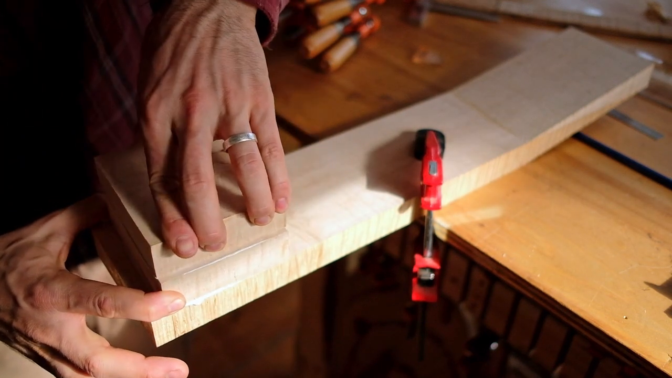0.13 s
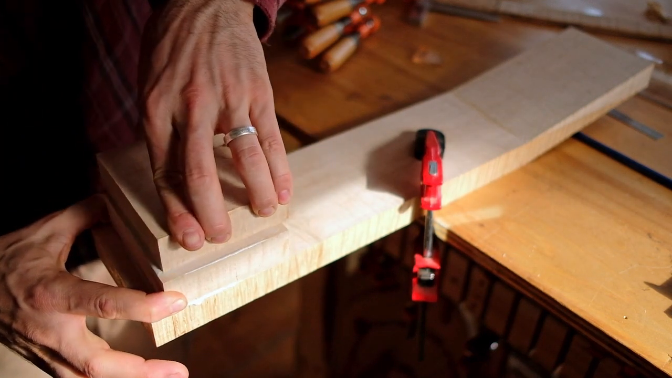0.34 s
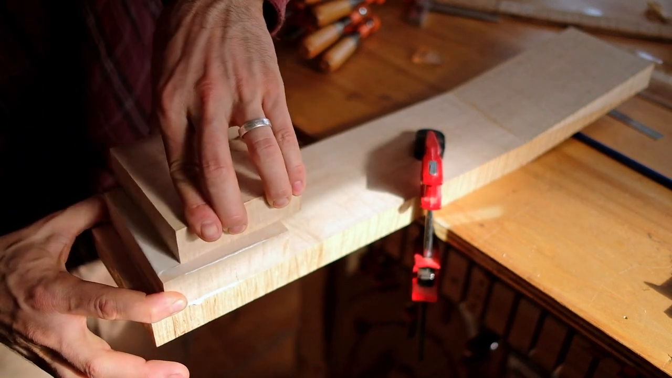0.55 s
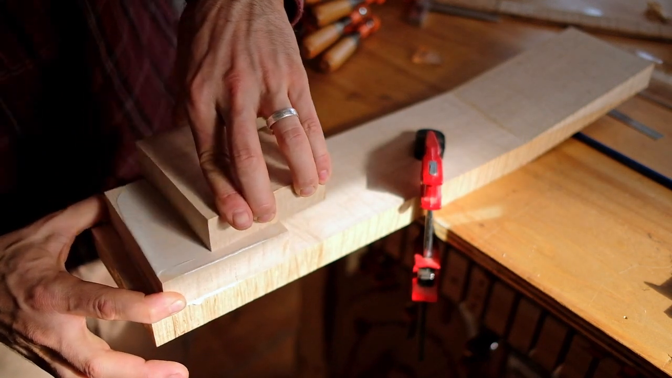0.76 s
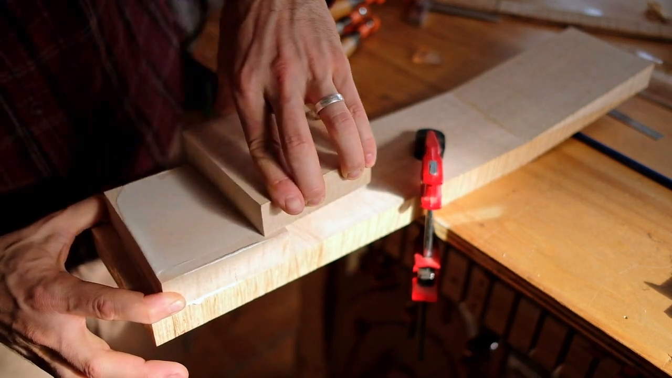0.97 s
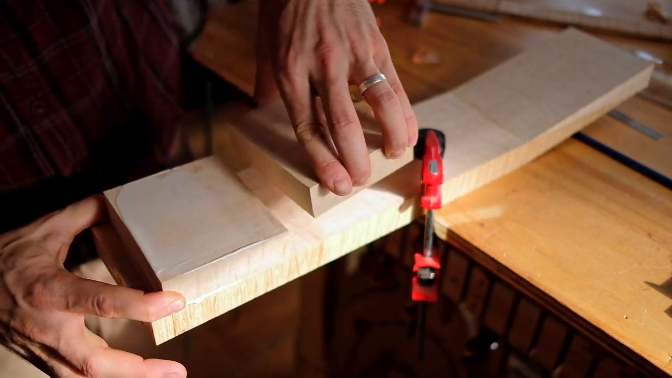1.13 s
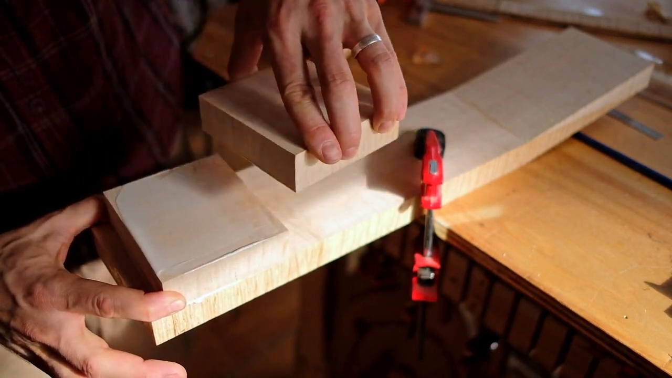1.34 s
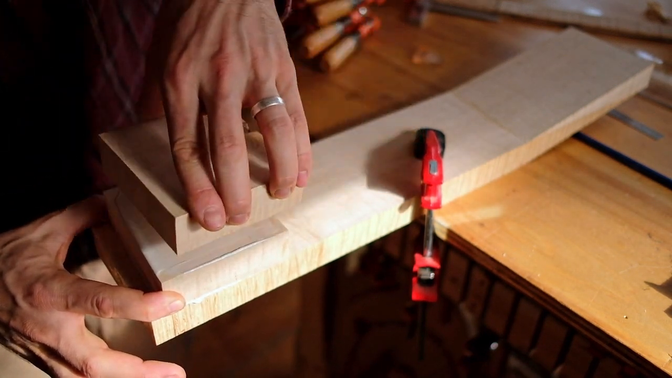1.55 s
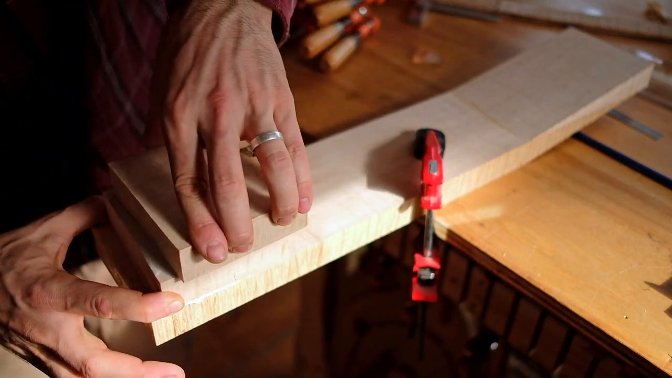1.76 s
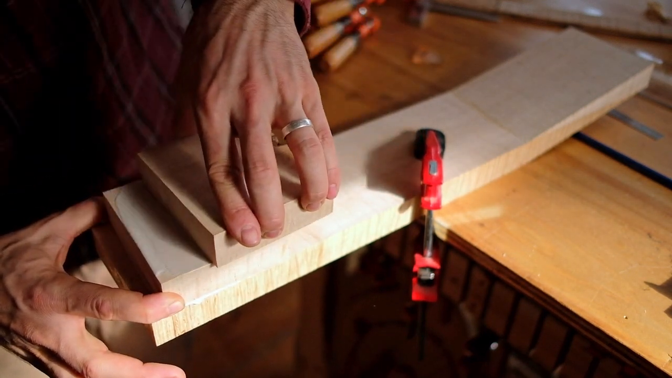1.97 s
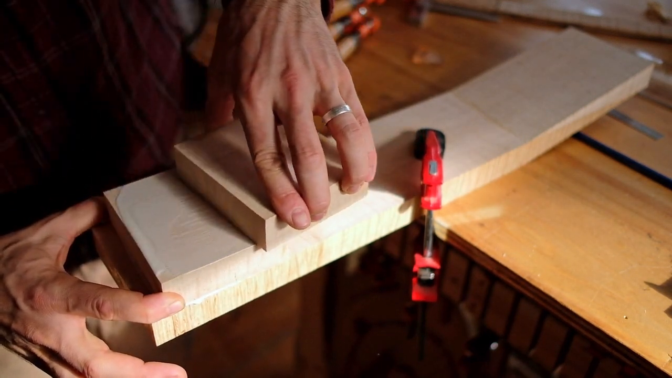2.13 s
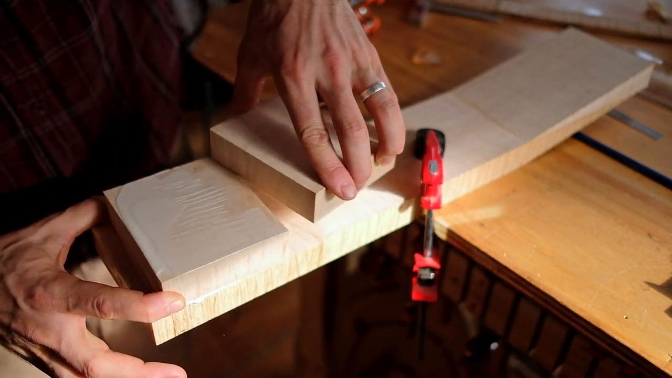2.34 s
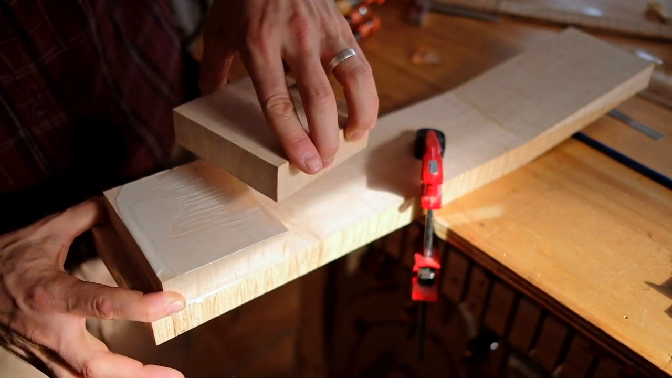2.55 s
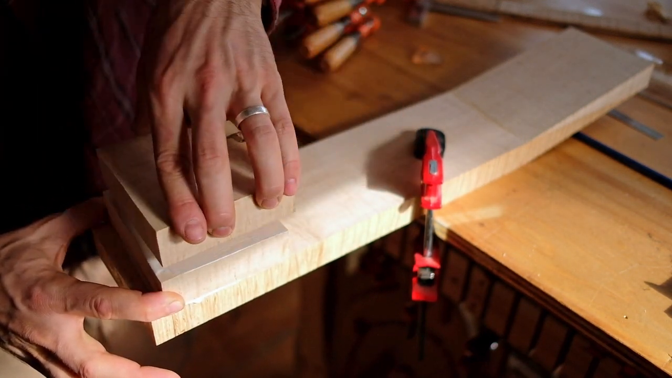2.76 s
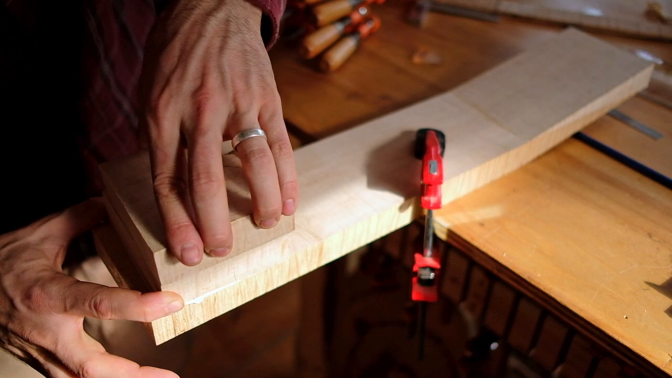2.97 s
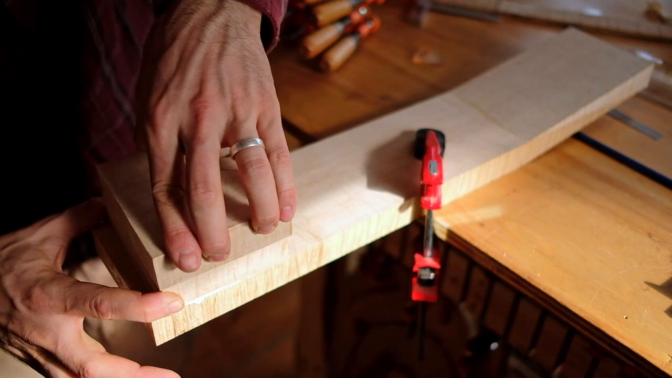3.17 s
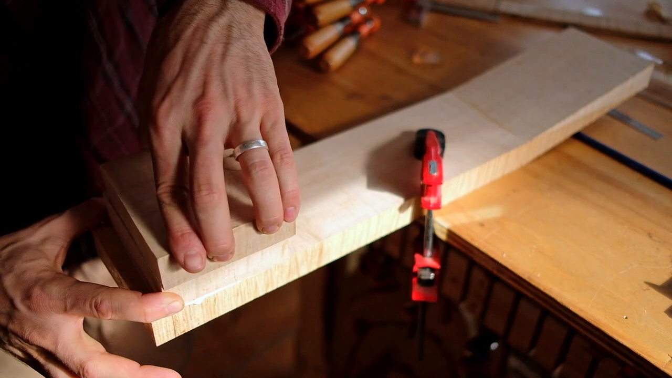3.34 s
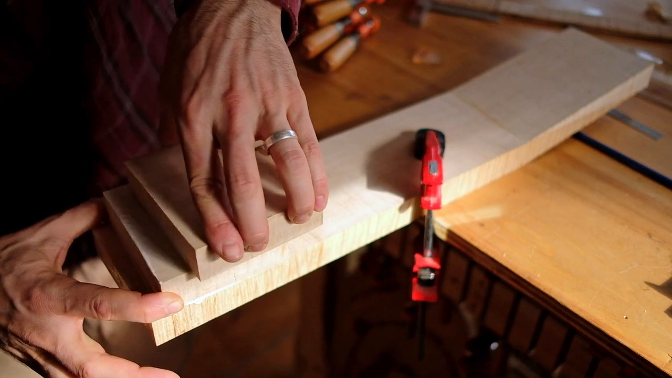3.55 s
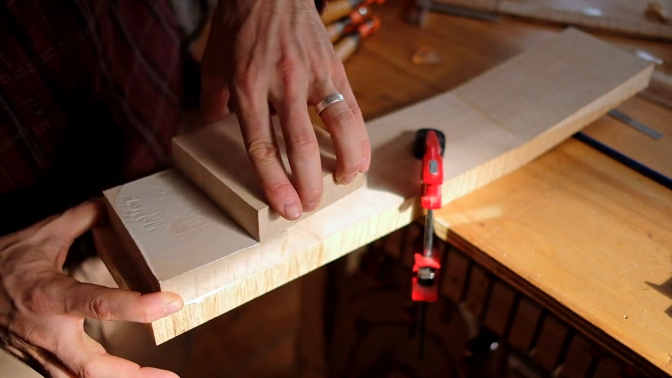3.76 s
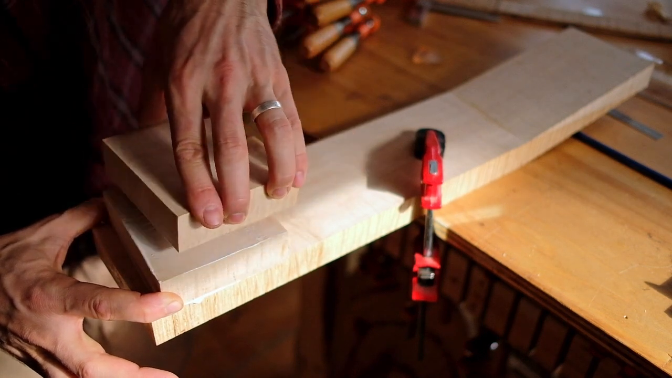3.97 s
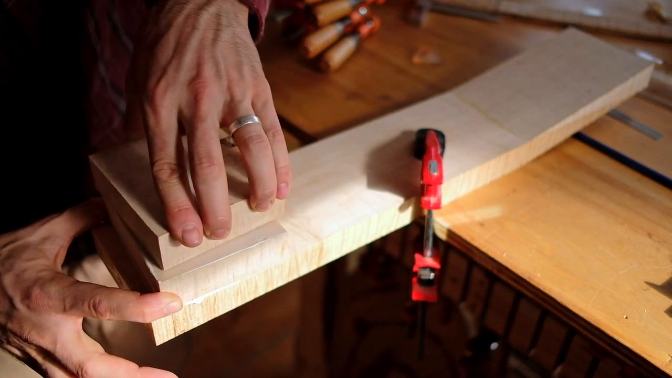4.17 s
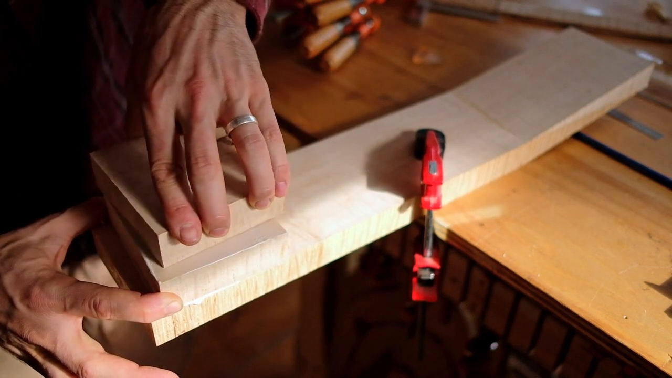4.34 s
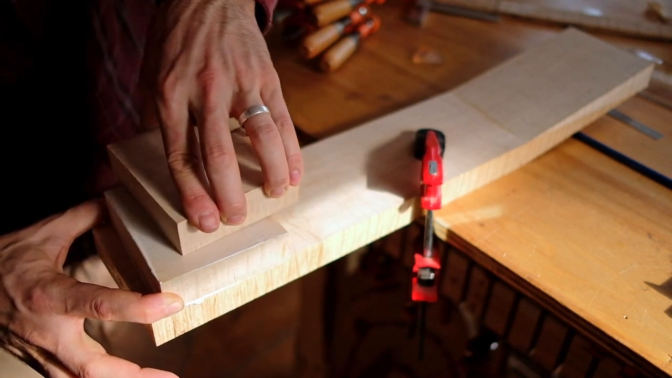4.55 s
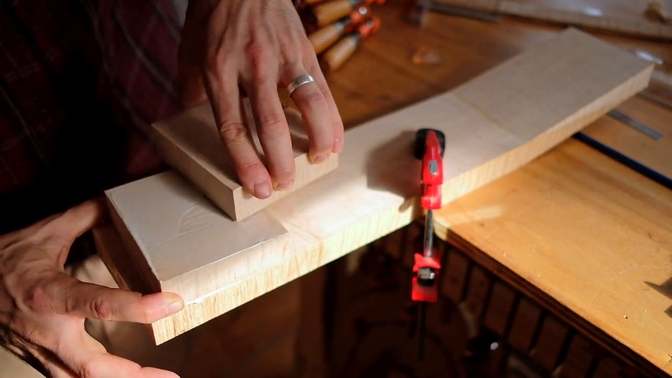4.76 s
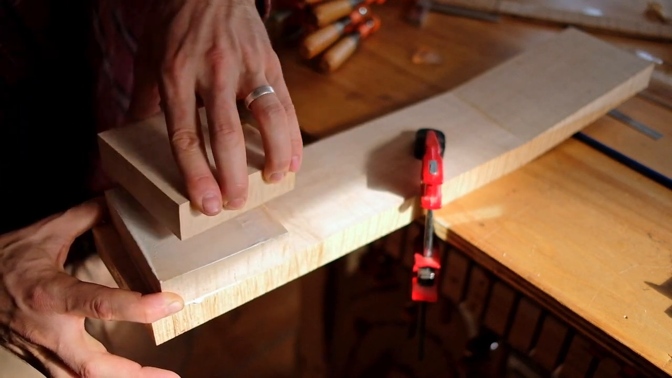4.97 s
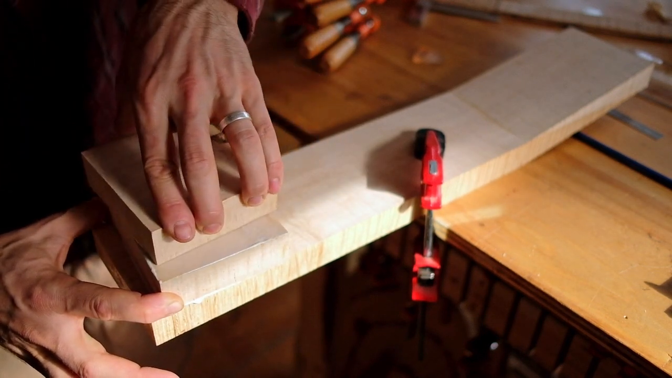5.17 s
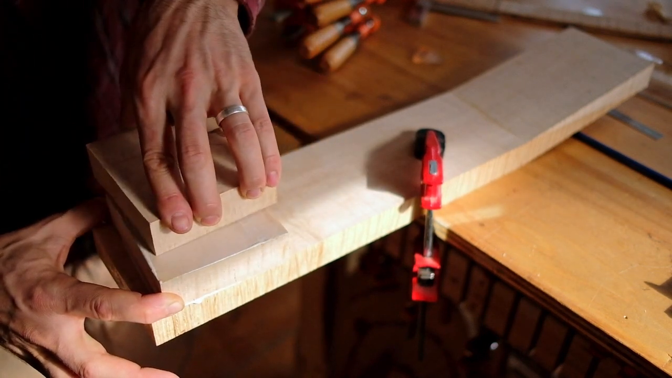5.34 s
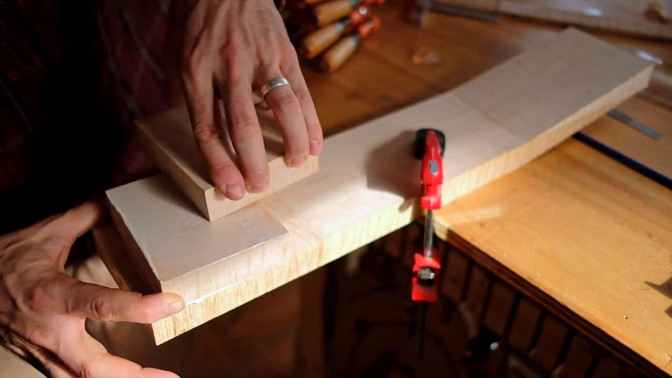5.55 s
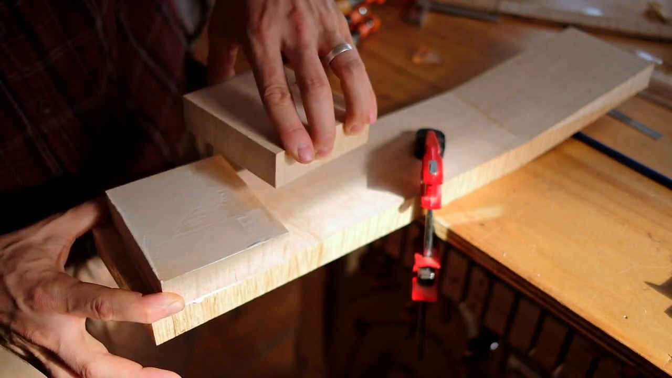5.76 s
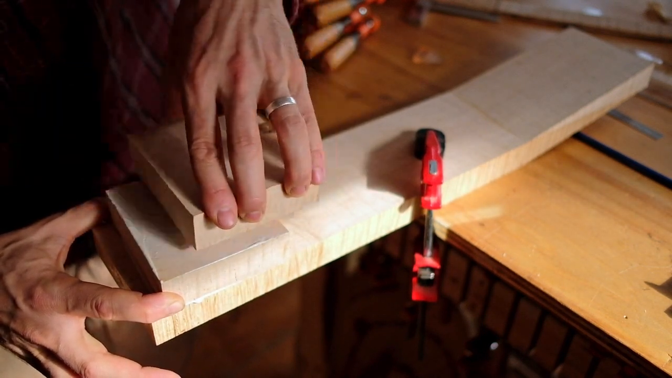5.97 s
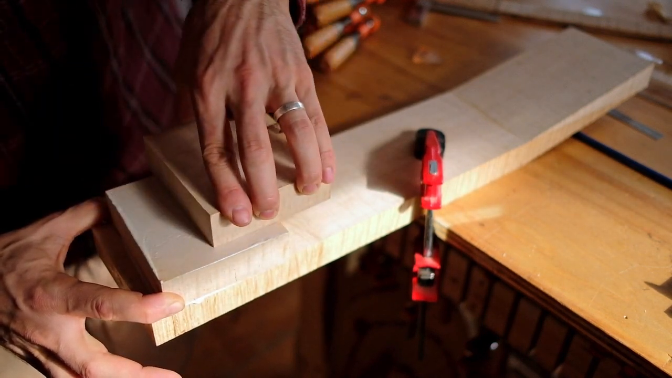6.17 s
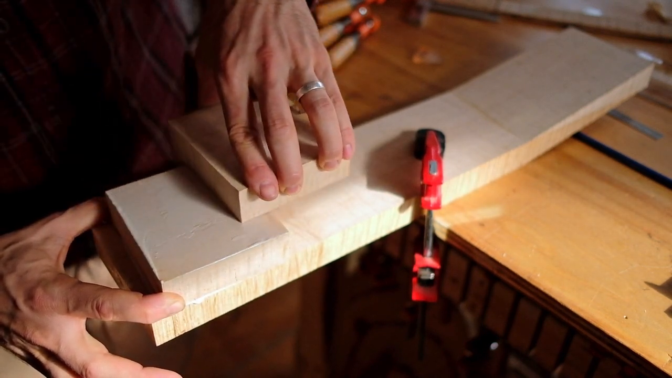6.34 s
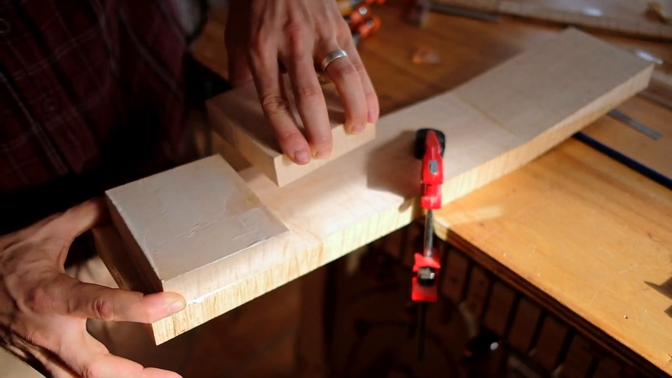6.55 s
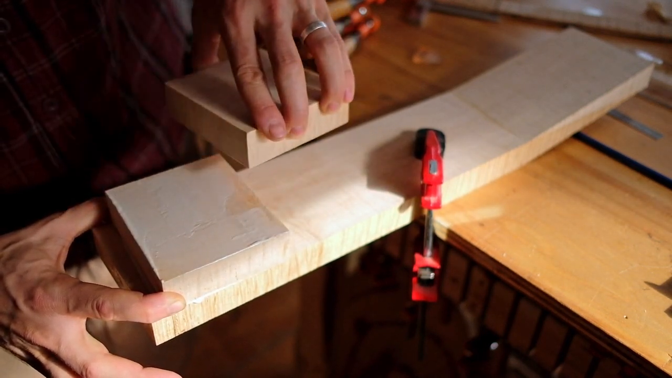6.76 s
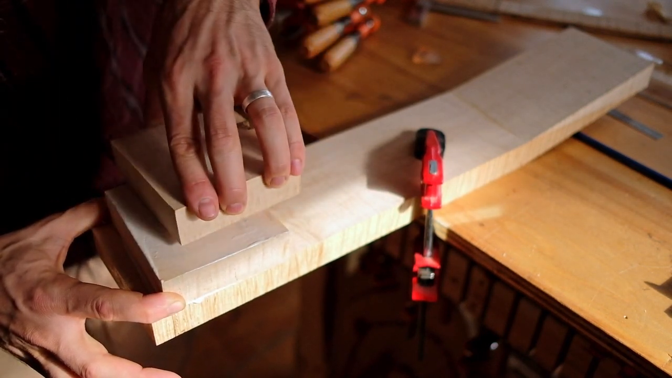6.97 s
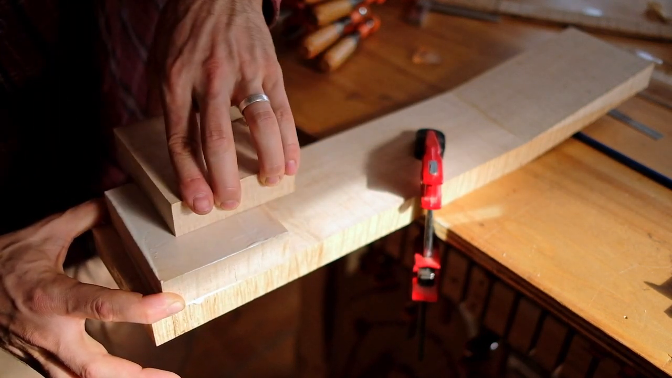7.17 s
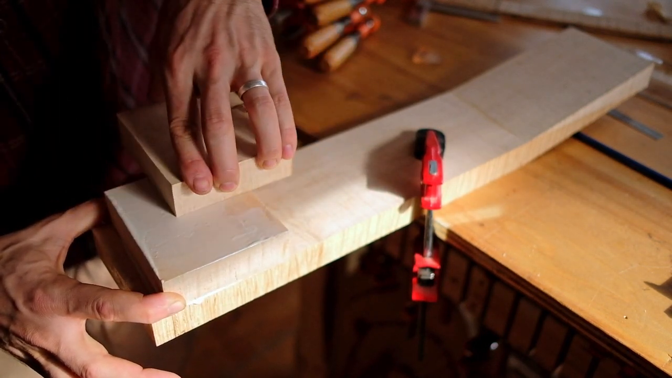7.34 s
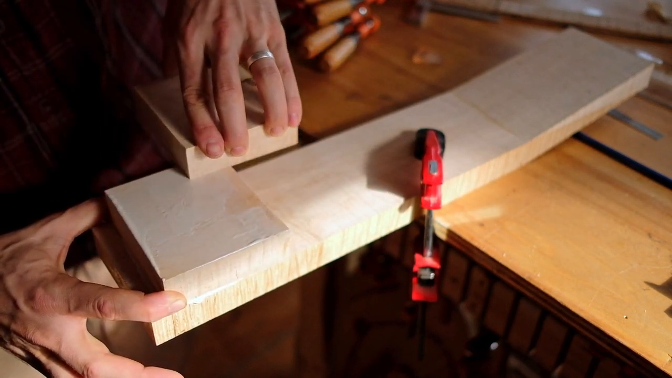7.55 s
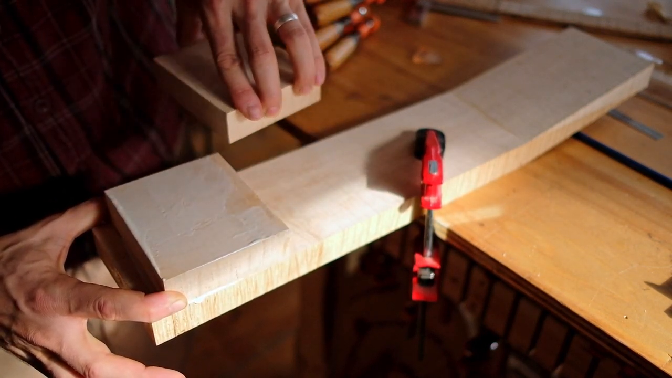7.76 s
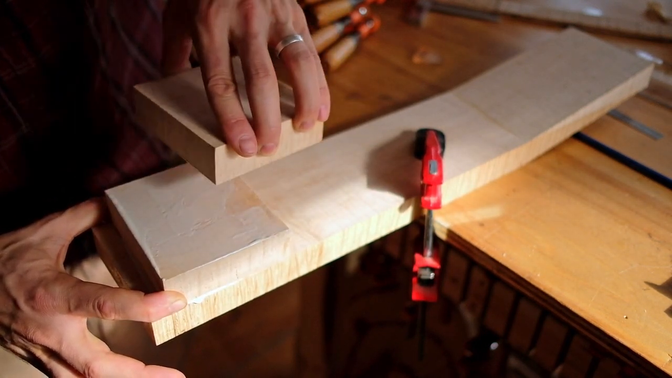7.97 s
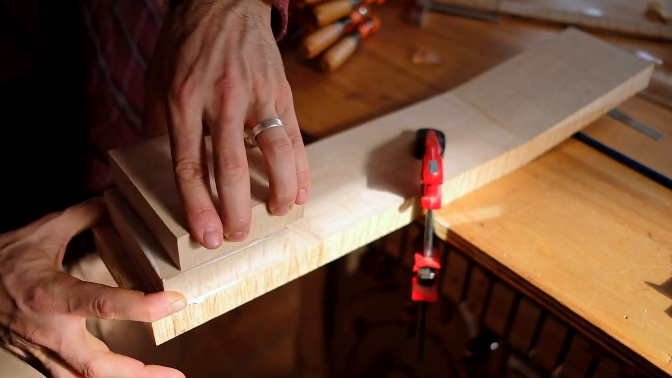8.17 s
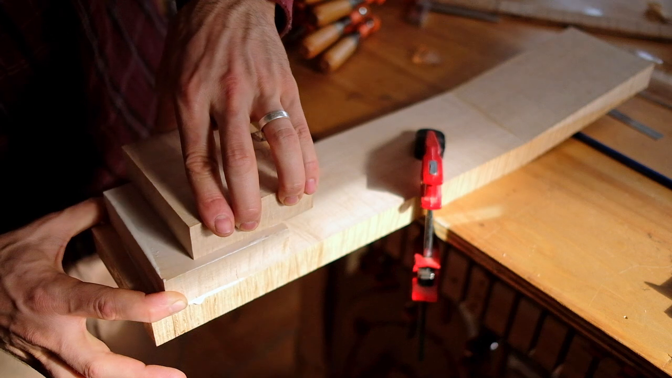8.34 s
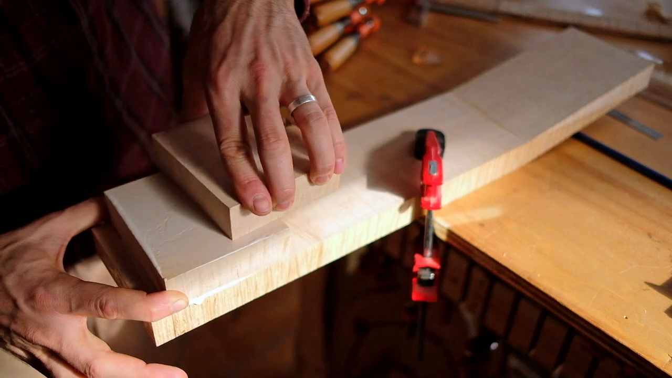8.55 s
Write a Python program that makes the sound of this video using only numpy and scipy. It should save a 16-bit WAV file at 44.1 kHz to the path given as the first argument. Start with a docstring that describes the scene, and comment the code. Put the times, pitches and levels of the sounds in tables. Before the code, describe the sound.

In a small quiet workshop, a wood block is lifted and set back on a thick plank. Solid, hollow knocks with low-mid body and a slight hard edge die within about a tenth of a second, leaving short room reflections. Strong and muted landings alternate, with very faint grain scrapes and dry clicks before some. Soft, steady, low-weighted air hiss lies underneath; the close microphones place the wood slightly left.

```python
"""Steady hiss, then a small tick, a scrape and a knock: a hand sets a wooden block down on a clamped wooden blank,
slides it off the edge and lifts it, again and again. Contact force spectra drive decaying modes of blank and bench;
dense random catches drive the same modes for slides; ticks are short rough tones. Single echoes and a small workshop
answer the wood; one low rumble swells around the first hard blow."""
import sys
import numpy as np
from scipy import signal
from scipy.fft import rfft, irfft
from scipy.io import wavfile
from scipy.ndimage import uniform_filter1d

SR = 44100
rng = np.random.default_rng(int(sys.argv[2]) if len(sys.argv) > 2 else 0)


def to_wav(s):
    """Save 16-bit WAV."""
    ch = np.atleast_2d(s).T  # columns
    pcm = np.round(np.clip(ch, -1, 1) * 32767)  # PCM
    wavfile.write(sys.argv[1], SR, pcm.astype(np.int16))


N = 379727  # samples

# Noise spectrum: freq_hz, relative_level_db
HISS_SPECTRUM = [(10, -29), (20, -11), (45, -5.5), (100, -4), (250, -4.5), (490, -9), (1000, -15),
                 (1600, -20), (2500, -24.5), (4000, -28), (6300, -31.5), (8000, -34), (12500, -38),
                 (15500, -43)]
# Noise balance: freq_hz, left_minus_right_db
HISS_BALANCE = [(60, 0.5), (220, 1.5), (820, 1.5), (3030, 0)]
# Noise left-right correlation: freq_hz, correlation_0_to_1
HISS_CORRELATION = [(40, 0.52), (300, 0.17), (2000, .05), (6000, .01)]
HISS_RMS_DB = -63.5  # mean of left and right

# Dry ticks of edges and fingers: start_s, level_db, pitch_hz, envelope_peak_ms
TICK_EVENTS = [(1.0447, -55, 1770, 1.3), (1.121, -47.5, 3180, 1.3), (2.3930, -54.5, 2960, 1.6),
               (3.7867, -49, 2520, 0.23), (4.8928, -53, 2510, 0.8), (6.5898, -46.5, 3000, 0.55),
               (6.5925, -50, 1960, 1.1), (7.602, -64, 10770, .12), (8.051, -60, 2560, 1.1)]

# Block sliding over the grain: start_s, length_s, rise_s, drag_db, rasp_db, drag_change_to_end_db, rasp_change_to_end_db
SLIDE_EVENTS = [(1.062, 0.06, 0.0083, -53, -68, -3, 11), (2.316, 0.085, 0.013, -44, -73, -6, 6),
                (3.75, 0.062, 0.016, -73, -70.5, -8, -1), (6.497, 0.037, .003, -51.5, -62, 5.5, -8),
                (6.569, 0.081, .01, -59, -71.5, -15, -5), (8.421, 0.08, 0.016, -65, -69, -11, -6)]
# Frequencies of the two catch force spectra: freq_hz
CATCH_HZ = [70, 190, 430, 770, 1200, 2100, 3300]
# Force of dull catches at CATCH_HZ: force_db
DULL_FORCE_DB = [-28.5, -12, -5, -0.5, -6.5, -21.5, -38]
# Force of sharp catches at CATCH_HZ: force_db
SHARP_FORCE_DB = [-60, -39, -32, -25, 4, 4.5, 2.5]
CATCHES_PER_S, SLIDE_STOP_S, SLIDE_PAN_DB = 2500, 0.02, -2.4
JUDDER_DB, JUDDER_S = 0.8, 0.013  # rms depth; inverse of the low-pass cutoff

# Modes of blank and bench: freq_hz, level_struck_at_end_db, level_struck_at_middle_db, t60_s
WOOD_MODES = [(68, 11, 13.5, 0.096), (152.1, -5.5, -1.5, 0.12), (222, -1.5, -5, .14),
              (239.3, 1.5, -1, 0.11), (315.4, 0, -1, 0.074), (361.3, -0.5, -3.5, 0.09),
              (417, -4.5, -0.5, 0.047), (453.5, -6.5, 0.5, .08), (503.5, 2.5, 1, 0.05),
              (531, -3, -2.5, 0.078), (587, -5.5, 0.5, .05), (657, -1, 0.5, 0.026), (697.5, -6, 5.5, 0.05),
              (770.6, 2, 2, 0.051), (882, 0.5, -1, 0.019), (988, -7, -6, 0.063), (1069, 3.5, -12, 0.03),
              (1172, -0.5, -6, 0.055), (1261, -2.5, -3.5, 0.057), (1300.4, -4.5, -3, 0.049),
              (1404, -5.5, -6.5, 0.031), (1568, -6, -12, 0.027), (1715, -2, -4.5, 0.015),
              (1896, -5.5, -1.5, 0.025), (1980, -1, -7, .025), (2169, -3, -4, .02),
              (2488, -0.5, 1.5, 0.012), (3080, 1, 1, .008), (3470, 1, 0, .008), (4300, -13, -12.5, 0.0054)]

# Block set down: start_s, level_db, contact_ms, bass_loss_db_per_octave, hard_corner_db, corner_contact_ms,
# place_0_end_1_middle, edge_click_rel_db
BLOW_EVENTS = [(1.125, -30, 0.89, 10.5, -8, 0.44, 0.53, -38), (1.7403, -7, 0.64, 8, -11.5, 0.48, 0.4, -39),
               (2.992, -14.5, 0.94, 7.5, -37, 0.42, 0.59, -45), (3.896, -46.5, 1.83, 12, -9, .42, 0.9, -35),
               (4.147, -29.5, 1.65, 0.8, -37, .42, 0.43, -44),
               (5.121, -19.5, 0.94, 2.5, -17.5, 0.5, 0.63, -30),
               (6.056, -8, 0.63, 7, -10.5, 0.36, 0.67, -30.5), (6.531, -30, 0.81, 2.5, -31, .42, 0.47, -33),
               (6.681, -48.5, 1.2, 7.5, -12.5, .42, 0.78, -34),
               (7.015, -10.5, 0.77, 5.5, -20.5, 0.72, 0.74, -45.5),
               (8.1805, -6.5, 0.81, 9, -29.5, 0.18, 0.71, -31.5)]
# Edge click spectrum: freq_hz, relative_level_db
CLICK_SPECTRUM = [(1000, -31), (2000, -1.5), (3200, 7.5), (4500, -9.5), (6300, -12), (10000, -23.5),
                  (15000, -36)]
CONTACT_FALL_DB_PER_OCT, CORNER_FALL_DB_PER_OCT = 39.5, 16
BENCH_CUT_HZ, BENCH_CUT_DB_PER_OCT = 170, 16
WOOD_PAN_DB, RIGHT_DELAY_SAMPLES = -2.5, 2  # pan is left minus right

# First echoes from bench top and near walls: delay_ms, level_db, pan_db
NEAR_ECHOES = [(4.4, -4.5, -3), (7.6, -8, 3.5), (10.8, -7.5, 0), (13.7, -13.5, 1.5), (16.6, -17, 0.5)]
NEAR_LOWPASS_HZ = 1713

# Workshop reverberation: freq_hz, t60_s, level_db, left_right_correlation
SHOP_BANDS = [(80, 0.81, 1, 0.64), (200, 0.23, 12, 1), (507, .3, 2.5, 0.87), (1000, 0.32, -6.5, 0.89),
              (2000, .32, 1.5, .4), (3300, 0.22, -5, .4), (6000, .2, -5.5, .3)]
TAP_SPACING, FIRST_TAP = 22, 130  # samples
CROSSFADE_HALF_TURNS_PER_S = 0.29

# Low rumble: start_s, level_db, freq_hz, length_s, pan_db
RUMBLE = (1.73, -52, 52, .17, -6)
BAND_LIMIT_HZ = 15720


def gain_of(db):
    """Decibels to gain."""
    return 10 ** (np.asarray(db) / 20)


def read(points, hz):
    """Interpolates a spectrum on a log-frequency axis."""
    f, value = np.transpose(points)
    return np.interp(np.log(hz + 1), np.log(f + 1), value)


def add(mix, start_s, sound, pan_db):
    """Mixes a sound in; pan_db is left minus right."""
    part = mix[:, round(start_s * SR):][:, :len(sound)]
    part += gain_of([[pan_db / 2], [-pan_db / 2]]) * sound[:part.shape[1]]


def hiss():
    """Room air and microphone self-noise: shaped Gaussian spectra, partly correlated left to right."""
    hz = np.fft.rfftfreq(N, 1 / SR)
    a, b, c, d = rng.standard_normal((4, len(hz)))
    same = np.clip(read(HISS_CORRELATION, hz), -1, 1)
    pan_db = read(HISS_BALANCE, hz)
    left = a + 1j * b
    right = same * left + np.sqrt(1 - same ** 2) * (c + 1j * d)
    level_db = read(HISS_SPECTRUM, hz) + [pan_db / 2, -pan_db / 2]
    out = irfft(np.array([left, right]) * gain_of(level_db), N)
    return gain_of(HISS_RMS_DB) * out / out.mean(0).std()


def ticks():
    """Each tick is a sine, roughened by smoothed noise, that swells and dies at once."""
    out, t = np.zeros((2, N)), np.arange(600) / SR
    noise = rng.standard_normal((len(TICK_EVENTS), 600))
    for (start_s, level_db, hz, peak_ms), chance in zip(TICK_EVENTS, noise):
        rough = 1 + 2.3 * uniform_filter1d(uniform_filter1d(chance, 14), 14)
        tone = np.sin(2 * np.pi * hz * t) * rough
        u = 1000 * t / peak_ms
        add(out, start_s, gain_of(level_db) * tone * (u * np.exp(1 - u)) ** 2, -1.)
    return out


def ring(place, force_db, detune=1, rise_cycles=1.26):
    """Modes of the struck wood, weighted by contact force; each builds over a few cycles, then decays."""
    hz, end_db, middle_db, t60_s = (c[:, None] for c in np.transpose(WOOD_MODES))
    t = np.arange(SR // 3) / SR
    sign = (-1.) ** np.arange(len(WOOD_MODES))[:, None]
    level_db = end_db + place * (middle_db - end_db) + force_db(hz) - 60 * t / t60_s
    build = (1 - np.exp(-t * hz / rise_cycles)) ** 1.1
    return (sign * gain_of(level_db) * build * np.sin(2 * np.pi * hz * detune * t)).sum(0)


def grain_catches():
    """Dense random impulses of the grain, their level juddering."""
    hits = (rng.random(N) < CATCHES_PER_S / SR) * rng.choice([-1, 1], N)
    catches = gain_of(3.5 * rng.exponential(1, N)) * hits
    catches = np.clip(catches / catches.std(), -20, 20)
    judder = signal.lfilter(*signal.butter(2, 1 / JUDDER_S, fs=SR), rng.standard_normal(N))
    return catches * gain_of(JUDDER_DB * judder / judder.std())


def slides():
    """Dense tiny catches of the grain excite the wood; sharp ones add a rasp."""
    catches = grain_catches()
    t, drag, rasp = np.arange(N) / SR, np.zeros(N), np.zeros(N)
    for start_s, length_s, rise_s, drag_db, rasp_db, drag_change_db, rasp_change_db in SLIDE_EVENTS:
        u = t - start_s
        done = np.clip(u / length_s, 0, 1)
        touch = np.clip(np.minimum(u / rise_s, (length_s - u) / SLIDE_STOP_S), 0, 1)
        drag += touch * gain_of(drag_db + drag_change_db * done)
        rasp += touch * gain_of(rasp_db + rasp_change_db * done)
    sound = np.zeros(N)
    for envelope, force_db, place in ((drag, DULL_FORCE_DB, 0.69), (rasp, SHARP_FORCE_DB, 0.4)):
        spectrum = list(zip(CATCH_HZ, force_db))
        body = ring(place, lambda hz: read(spectrum, hz))
        sound += signal.oaconvolve(envelope * catches, body / np.linalg.norm(body))[:N]
    return sound * gain_of([[SLIDE_PAN_DB / 2], [-SLIDE_PAN_DB / 2]])


def slope(hz, knee_hz, db_per_octave):
    """Level in dB: flat below the knee, falling above it; swapping hz and knee_hz makes it fall below."""
    return -10 * np.log10(1 + (hz / knee_hz) ** (db_per_octave / (10 * np.log10(2))))


def force(hz, contact_ms, bass_loss_db_per_oct, corner_db, corner_ms):
    """Landing force in dB: long soft contact plus short corner contact; the bench hardly sounds the bass."""
    contact_hz = 1000 / contact_ms
    soft_db = slope(hz, contact_hz, CONTACT_FALL_DB_PER_OCT)
    hard_db = corner_db + slope(hz, 1000 / corner_ms, CORNER_FALL_DB_PER_OCT)
    bass_db = slope(contact_hz, hz, bass_loss_db_per_oct)
    bench_db = slope(BENCH_CUT_HZ, hz, BENCH_CUT_DB_PER_OCT)
    return bass_db + bench_db + 20 * np.log10(gain_of(soft_db) + gain_of(hard_db))


def click(chance):
    """Crack from the hard edges: shaped noise dying in a few milliseconds."""
    t = np.arange(len(chance)) / SR
    hz = np.fft.rfftfreq(len(chance), 1 / SR)
    out = irfft(rfft(chance) * gain_of(read(CLICK_SPECTRUM, hz)))
    envelope = np.exp(-t / 0.0024) * (1 - np.exp(-t / .0003))
    fade_out = np.hanning(2 * len(t))[len(t):]
    return out / out.std() * envelope * fade_out


def blows():
    """The block lands with an edge click and its contact force rings the wood."""
    out = np.zeros((2, N))
    for row, chance in zip(BLOW_EVENTS, rng.standard_normal((len(BLOW_EVENTS), 1024))):
        start_s, level_db, *landing, place, click_db = row
        detune = 1 + 0.011 * chance[-len(WOOD_MODES):, None]  # small random shift of each mode, new for every blow
        knock = ring(place, lambda hz: force(hz, *landing), detune)
        nominal_peak = 4.9 * knock[:SR // 50].std()
        add(out, start_s, gain_of(level_db) * knock / nominal_peak, WOOD_PAN_DB)
        add(out, start_s, gain_of(level_db + click_db) * click(chance), WOOD_PAN_DB)
    return out


def near(x):
    """Single echoes of alternating sign fill the first twenty milliseconds, duller than the direct sound."""
    taps = np.zeros((2, SR // 40))
    for k, (delay_ms, level_db, pan_db) in enumerate(NEAR_ECHOES):
        add(taps, delay_ms / 1000, (-1) ** k * gain_of([level_db]), pan_db)
    taps = signal.lfilter(*signal.butter(2, NEAR_LOWPASS_HZ, fs=SR), taps)
    return signal.oaconvolve(x, taps, axes=1)[:, :N]


def echoes():
    """Reflections at random times and of random sign, each band with its own decay and left-right correlation."""
    taps = np.zeros((2, SR // 2))
    at = np.arange(FIRST_TAP, SR // 2 - TAP_SPACING, TAP_SPACING)
    at = at + rng.integers(0, TAP_SPACING, (2, len(at)))
    np.put_along_axis(taps, at, rng.choice([-1., 1.], at.shape), 1)
    hz, t, (a, b) = signal.stft(taps, SR, nperseg=256)
    bands = np.array(SHOP_BANDS)
    t60_s, level_db, same = (read(bands[:, [0, k]], hz)[:, None] for k in (1, 2, 3))
    turn = np.arccos(np.clip(same, 0, 1)) / 2
    shared, apart = np.cos(turn) * a, np.sin(turn) * b
    z = np.array([shared + apart, shared - apart])
    energy = t60_s * (SR / TAP_SPACING) / (2 * np.log(1000))  # of the decaying taps
    return signal.istft(z * gain_of(level_db - 60 * t / t60_s) / np.sqrt(energy), SR, nperseg=256)[1]


def shop(x):
    """The workshop tail crossfades steadily among three random sets of reflections."""
    half_turns = np.arange(N) / SR * CROSSFADE_HALF_TURNS_PER_S
    out = np.zeros((2, N))
    for k in range(3):
        share = np.sqrt(2 / 3) * np.cos(np.pi * (half_turns + k / 3))  # squares sum to 1
        out += signal.fftconvolve(x * share, echoes(), axes=1)[:, :N]
    return out


def rumble():
    """A low sine that swells and dies."""
    out = np.zeros((2, N))
    start_s, level_db, hz, length_s, pan_db = RUMBLE
    t = np.arange(round(length_s * SR)) / SR
    add(out, start_s, gain_of(level_db) * np.sin(2 * np.pi * hz * t) * np.hanning(len(t)), pan_db)
    return out


def scene():
    """Wood sounds, their echoes, rumble and hiss; the left microphone is nearer, so the right lags."""
    wood, small = blows() + slides(), ticks()
    direct = np.array([wood[0], np.roll(wood[1], RIGHT_DELAY_SAMPLES)])
    return direct + near(direct) + small + shop(wood + small) + rumble() + hiss()


def record(dry):
    """Band limit of the recorder: linear-phase low-pass."""
    lowpass = signal.firwin(1023, BAND_LIMIT_HZ, window=("kaiser", 9), fs=SR)
    return signal.oaconvolve(dry, lowpass[None], "same")


dry = scene()
out = record(dry)
to_wav(out)
```